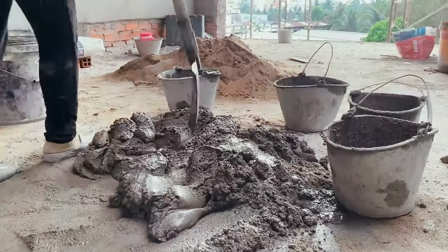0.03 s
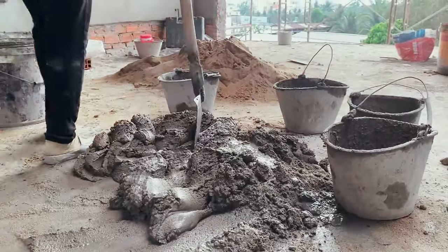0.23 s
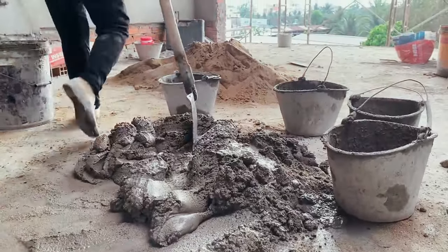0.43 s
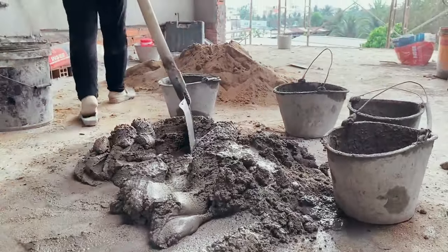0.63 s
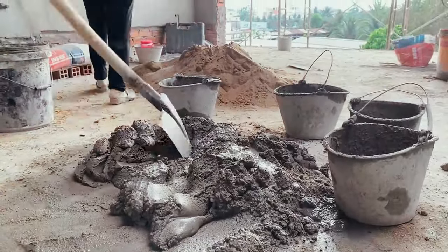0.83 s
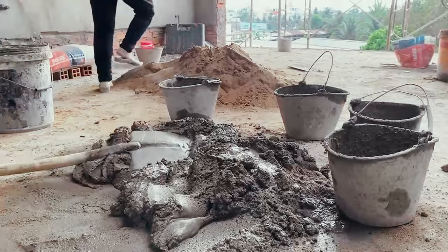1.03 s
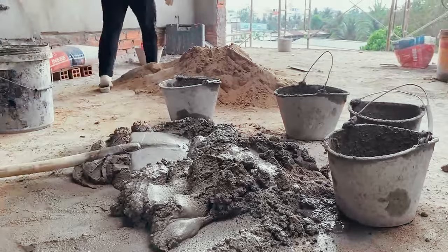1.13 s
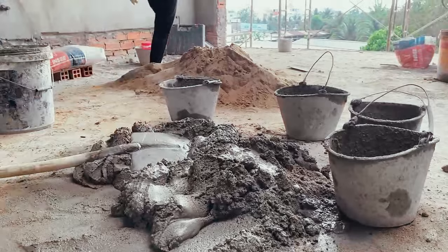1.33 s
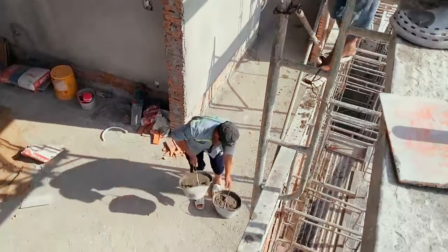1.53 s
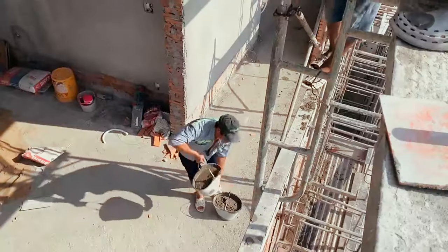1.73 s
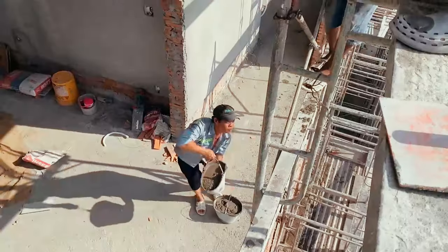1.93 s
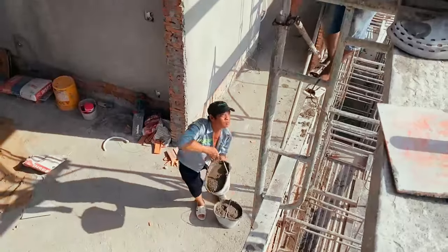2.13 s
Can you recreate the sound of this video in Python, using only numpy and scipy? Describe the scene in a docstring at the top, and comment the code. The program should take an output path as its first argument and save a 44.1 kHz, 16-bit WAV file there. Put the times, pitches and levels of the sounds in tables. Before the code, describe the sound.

Shovelling wet mortar with gritty scrapes and a ringing splat, followed by a rasping bucket pour.

```python
"""Shovelling and pouring wet mortar

A shovel stabs into a heap of wet mortar, leans over with a gritty scrape and flops onto the pile,
its shaft and blade ringing, while shoes scuff over concrete. After a short silence, mortar slides
out of a bucket and the last lumps trickle after it. Bare walls echo over the low rumble of the site."""
import sys
import numpy as np
from scipy import signal
from scipy.fft import rfft, irfft
from scipy.io import wavfile

SR = 44100
rng = np.random.default_rng(int(sys.argv[2]) if len(sys.argv) > 2 else 0)


def generate_wav(signal):
    """Clip the signal to [-1, 1] and save it as 16-bit WAV at the path in sys.argv[1]."""
    frames = np.transpose(np.atleast_2d(signal))
    scaled = np.clip(frames, -1, 1) * 32767
    pcm = np.round(scaled).astype(np.int16)
    wavfile.write(sys.argv[1], SR, pcm)


N = 97020
T = np.arange(N) / SR
FFT_SIZE = 2 ** 17
HZ = np.maximum(np.arange(FFT_SIZE // 2 + 1) * SR / FFT_SIZE, 1)

# Sounds are built as a pair: mid (what both ears share) and side (what sets left and right apart).
# How wide noise and echo sound. Each row: frequency in Hz, side level compared with mid in dB.
STEREO_WIDTH = [(60, -9), (160, -10.5), (400, -6.5), (800, -3), (2000, -2.5), (6000, -3.5), (12000, -0.5)]


def shovel():
    """Each blow sets shaft and blade ringing; clinging mortar muffles the tones and makes them drift."""
    # The shovel's own tones. Each row: pitch in Hz, level in dB, fade time in seconds.
    tones = [(205.6, 6, 0.15), (473, -28, 0.14), (523.2, 3.5, 0.43), (582, 6, 0.1), (639, -4, 0.27),
             (790, -9.5, .2), (875, -15, 0.32), (886, -16.5, .3), (979, -11, 0.64), (1869, -15.5, 0.14),
             (3220, -26, 0.11)]
    # Each row: start in seconds, level in dB, rise and muffled fade in seconds, then in dB
    # the level of the free ringing, the gain of the shaft's tones, and left compared with right.
    blows = [(.1128, -10, 0.0078, 0.017, -23.5, -5.5, -1), (1.045, -31, 0.0085, 0.047, -3, -43, -6),
             (1.0615, -23, 0.0039, 0.049, -19, -12, -25), (1.089, -33, 0.0041, 0.078, -10, -20, -2)]
    shaft_top_hz, blade_side_db = 300, -11
    drifts_hz = [10 * wander(rate=70) for _ in tones]
    out = np.zeros((2, N))
    for start, db, rise, muffled_fade, ring_db, shaft_db, pan_db in blows:
        age = np.maximum(T - start, 0)
        muffled = envelope(start, db, rise, 0, muffled_fade)
        pan = (amp(pan_db) - 1) / (amp(pan_db) + 1)
        for (hz, tone_db, fade), drift_hz in zip(tones, drifts_hz):
            is_shaft = hz < shaft_top_hz
            free = envelope(start, db + ring_db, rise, 0, fade)
            level = amp(tone_db + shaft_db * is_shaft) / 2 * (muffled + free)
            phase = 2 * np.pi * (hz * age + np.cumsum(drift_hz * (T > start)) / SR)
            ring = -np.sin(phase)
            # The blade's two faces send sound left and right out of step.
            side = pan * ring + amp(blade_side_db) * (not is_shaft) * np.cos(phase)
            out += level * np.array([ring, side])
    return out


def crunch():
    """The blade cuts through wet sand and stops hard."""
    # Each row: start in seconds, level in dB, then rise, hold and fade in seconds.
    cuts = [(0.076, -38.5, 0.031, .012, 0.053), (0.1102, -32, 0.0019, 0.006, 0.028),
            (0.124, -48, 0.0044, 0.0075, 0.63)]
    # The crushed grit's tone colour. Each row: frequency in Hz, level in dB.
    colour = [(300, -7), (800, -6.5), (1400, -6), (1850, -10.5), (2650, -13.5), (3300, -11.5),
              (4800, -18.5), (7100, -15), (8900, -9), (11100, -6), (15500, -20)]
    grit = grains(rate=4500, spread_db=2.5, hiss_db=-11)
    return diffuse(grit, amp(curve(colour))) * bursts(cuts)


def slaps():
    """The blade splats as it sinks into the heap or lands flat on it."""
    # Each row: start in seconds, level in dB, then rise, hold and fade in seconds.
    splats = [(0.125, -43.5, 0.0065, 0.041, 0.095), (1.04, -37, 0.015, 0.01, 0.046),
              (1.0626, -27, 0.00018, 0.0072, 0.069), (1.089, -41.5, 0.0048, 0.043, 0.052)]
    # The wet tone colour. Each row: frequency in Hz, level in dB.
    colour = [(40, -61), (100, -13), (330, -4), (425, -13.5), (500, 0.5), (800, -5.5), (1100, -12.5),
              (1300, -14.5), (2150, -20), (2800, -23.5), (3900, -28), (5000, -37), (8000, -41),
              (11000, -37), (15000, -51)]
    spatter = grains(rate=1800, spread_db=1.5, hiss_db=-2.5)
    return diffuse(spatter, amp(curve(colour))) * bursts(splats)


def clacks():
    """Stones in the mix strike the flat of the blade."""
    # Each row: start in seconds, level in dB, then rise, hold and fade in seconds.
    strikes = [(1.044, -44, 0.011, 0.0096, 0.042), (1.0565, -34.5, 0.00092, 0.0037, 0.0092),
               (1.0619, -33, 0.00028, 0.0007, 0.027), (1.071, -39.5, 0.00057, 0.0045, 0.075)]
    # The blade's bright tones. Each row: pitch in Hz, width in Hz, level in dB.
    blade_tones = [(2150, 170, -3), (3490, 270, -4), (3790, 700, 1), (4380, 480, -14)]
    return ringing_noise(blade_tones) * bursts(strikes)


def gulps():
    """The wet heap gulps after the stab, in low tones that waver and sag in pitch."""
    # Each row: start in seconds, level in dB, hold and fade in seconds, first and last pitch in Hz.
    low_tones = [(0.121, -34.5, 0.0057, 0.059, 218, 169), (0.159, -33.5, 0.022, 0.11, 185.5, 169),
                 (.256, -48.5, 0.012, 0.17, 187.6, 159), (0.291, -41, 0.014, 0.039, 159, 133),
                 (0.335, -47.5, 0.062, 0.18, 211.6, 163.2)]
    rise_s, sag_s, waver_hz = .01, .035, 9
    mid = np.zeros(N)
    for start, db, hold, fade, first_hz, last_hz in low_tones:
        sag = np.exp(-np.maximum(T - start, 0) / sag_s)
        hz = last_hz + (first_hz - last_hz) * sag + waver_hz * wander(rate=45)
        phase = 2 * np.pi * np.cumsum(hz * (T > start)) / SR
        mid += np.sqrt(2) * np.sin(phase) * envelope(start, db, rise_s, hold, fade)
    return np.array([mid, np.zeros(N)])


def scrapes():
    """Steel drags over sand and squeals faintly."""
    # Each row: start in seconds, level in dB, rise, hold and fade in seconds,
    # treble tilt in dB per octave, squeal level in dB.
    drags = [(0.475, -55.5, 0.012, 0.045, 0.15, 2, -6), (0.501, -58, 0.013, 0.0092, 0.1, -2.5, 5),
             (0.532, -47.5, 0.016, 0.015, 0.33, 1, 0), (1.399, -42, 0.015, .012, 0.2, -3, -31)]
    # The scrape's tone colour before tilting. Each row: frequency in Hz, level in dB.
    colour = [(150, -25.5), (400, -3.5), (900, 5), (1300, 3), (2200, -8), (3800, -6), (6000, -14.5),
              (11000, -13.5), (15000, -31)]
    grit = grains(rate=2300, spread_db=2.5, hiss_db=-0.5)
    squeal = diffuse(grit, resonance(hz=1040, width_hz=70))
    out = np.zeros((2, N))
    for *burst, tilt, squeal_db in drags:
        rasp = diffuse(grit, tilted(colour, tilt))
        out += (rasp + amp(squeal_db) * squeal) * envelope(*burst)
    return out


def fizz():
    """Wet sand crackles finely as the leaning blade parts it."""
    # Each row: start in seconds, level in dB, then rise, hold and fade in seconds.
    partings = [(0.715, -55.5, 0.008, 0.13, 0.51), (0.852, -61, 0.0086, 0.026, 0.63)]
    # The crackle's thin, high tone colour. Each row: frequency in Hz, level in dB.
    colour = [(2000, -9), (6000, -21), (9000, -2), (11000, 0), (12500, -1), (15000, -13)]
    crackle = grains(rate=2500, spread_db=2.5, hiss_db=0)
    return diffuse(crackle, amp(curve(colour))) * bursts(partings)


def pour():
    """Mortar rasps along the bucket wall and rings it; coarser lumps and stones trickle after."""
    # Each row of both: start in seconds, level in dB, then rise, hold and fade in seconds.
    slides = [(1.535, -50, 0.0041, 0.015, 0.079), (1.551, -43, 0.015, 0.011, 0.27),
              (1.576, -37.5, 0.01, 0.054, 0.48), (1.647, -44, 0.019, 0.021, 0.61)]
    trickles = [(1.887, -58.5, .005, 0.012, 0.41), (1.963, -56.5, 0.013, 0.016, 0.17),
                (2, -53, 0.012, 0.03, 0.34), (2.056, -52.5, 0.036, 0.022, 1)]
    # Their tone colours. Each row: frequency in Hz, level in dB.
    slide_colour = [(180, -44), (300, -15.5), (590, 0), (950, 0.5), (1300, -12), (1700, -5.5), (2650, -6),
                    (5350, -13), (7700, -15), (10800, -8), (12200, -13), (13000, -11), (15000, -46)]
    trickle_colour = [(300, -12.5), (800, 2.5), (1400, -6.5), (2400, 0.5), (4200, -2.5), (6000, -12.5),
                      (8000, -10), (11000, -3.5), (15000, -16)]
    # The bucket's own tones. Each row: pitch in Hz, width in Hz, level in dB.
    bucket_tones = [(605.8, 9.2, 8), (870.4, 44, 2.5), (1847, 90, 1.5), (2023, 9.4, 7), (2612, 82, -1.5),
                    (3174, 25, -1.5), (3917, 68, -4), (4740, 200, -10.5)]
    grit = diffuse(grains(rate=4400, spread_db=1, hiss_db=-2), amp(curve(slide_colour)))
    lumps = diffuse(grains(rate=1200, spread_db=0, hiss_db=-1), amp(curve(trickle_colour)))
    stones = amp(-11.5) * pebbles(count=900)
    wall = amp(-6.5) * ringing_noise(bucket_tones)
    slip = unit(amp(1.2 * wander(rate=130)))  # the mortar catches and slips
    return (grit * slip + wall) * bursts(slides) + (lumps + stones + amp(-9) * wall) * bursts(trickles)


def pebbles(count, low_hz=1690, high_hz=4820, fade_s=0.012):
    """Small stones tick against one another, each with its own brief pitch."""
    out = np.zeros((2, N))
    age = np.arange(int(fade_s * SR)) / SR
    for when, pitch, size, place in rng.random((count, 4)):
        hz = low_hz * (high_hz / low_hz) ** pitch
        ping = size ** 2 * np.sin(2 * np.pi * hz * age) * decay(age, fade_s)
        start = int(when * (N - len(age)))
        direction = [np.cos(np.pi * place), np.sin(np.pi * place)]
        out[:, start:start + len(age)] += np.outer(direction, ping)
    return unit(out)


def snaps(begin, end):
    """Stones snap under blade, shoe or bucket between two moments, each a brief cluster of clicks."""
    # Each row: start in seconds, level in dB.
    stones = [(0.3085, -45.5), (0.61, -47.5), (0.739, -55), (1.541, -44.5), (1.557, -41), (1.8925, -58),
              (2.006, -46), (2.109, -48), (2.172, -50)]
    clicks = grains(rate=5200, spread_db=0.5, hiss_db=-13.5)
    chips = diffuse(clicks, resonance(hz=3620, width_hz=33000))
    return chips * sum(envelope(start, db, rise=0.00073, hold=0.0013, fade=0.039)
                       for start, db in stones if begin <= start < end)


def thuds():
    """The heap and the footsteps on the floor thud softly."""
    # Each row: start in seconds, level in dB, then rise, hold and fade in seconds.
    bumps = [(0, -53, 0.0066, 0.11, 0.47), (0.127, -37.5, 0.019, 0.04, 0.22),
             (0.255, -50.5, 0.021, .015, 0.67), (0.471, -51.5, 0.014, 0.21, 0.22),
             (0.854, -60.5, 0.0058, 0.0086, 0.14), (1.057, -41, 0.012, 0.017, 0.57),
             (1.345, -56, .01, 0.065, .2)]
    # The dull tone colour. Each row: frequency in Hz, level in dB.
    colour = [(35, -57), (68, -14), (105, -8.5), (160, -0.5), (210, -15.5), (300, -18.5), (600, -50)]
    return diffuse(noise(), amp(curve(colour))) * bursts(bumps)


def scuffs():
    """Shoes and shifting mortar rub grit over the concrete."""
    # Each row: start in seconds, level in dB, rise, hold and fade in seconds, tilt in dB per octave.
    rubs = [(0, -54.5, 0.00057, 0.0092, 0.37, 0), (0.303, -64, 0.004, 0.0068, 0.048, -5),
            (0.315, -49.5, 0.007, 0.02, 0.44, -1), (0.41, -53.5, 0.027, 0.067, 0.21, -2.5),
            (0.604, -47.5, 0.0048, 0.0088, 0.47, -0.5), (0.725, -52, 0.0087, 0.0081, 0.08, -2),
            (0.851, -59, 0.012, 0.026, 1, 1), (1.025, -49.5, 0.017, 0.039, 0.09, 0.5)]
    # The scuff's tone colour before tilting. Each row: frequency in Hz, level in dB.
    colour = [(200, 7), (550, 2.5), (1100, -2.5), (2000, -3.5), (4000, -5), (7500, -9.5), (11000, -5),
              (15000, -12)]
    grit = grains(rate=4200, spread_db=1, hiss_db=-3.5)
    return sum(diffuse(grit, tilted(colour, tilt)) * envelope(*burst) for *burst, tilt in rubs)


def room(sources, echo_db, delay_s=0.0042, build_s=0.0016):
    """Mix the sources and add the dense echo of bare walls, which dies sooner in the treble."""
    # How long the echo lasts. Each row: frequency in Hz, fade time in seconds.
    fades = [(100, .5), (500, .3), (2000, .34), (6000, .29), (14000, .23)]
    age = np.maximum(T - delay_s, 0)
    hiss, tail = noise(), 0
    for hz, fade in fades:
        band = curve([(other_hz, other_hz == hz) for other_hz, _ in fades])
        tail = tail + shape(hiss, band) * decay(age, fade)
    tail = unit(tail * (1 - np.exp(-age / build_s))) / np.sqrt(N)
    to_walls = sum(source[0] * amp(db) for source, db in zip(sources, echo_db))
    mid, side = shape(to_walls, rfft(tail, FFT_SIZE))
    return sum(sources) + np.array([mid, shape(side, amp(curve(STEREO_WIDTH)))])


def site_rumble():
    """Far rumble and hiss of the site, behind the shovel."""
    # Each row: frequency in Hz, level in dB.
    colour = [(25, -27), (60, -3), (150, 3), (300, -5), (550, -5.5), (1100, -7.5), (1700, -12),
              (3900, -18.5), (7000, -28.5), (11000, -21.5), (15000, -38)]
    return diffuse(noise(), amp(curve(colour))) * amp(-60.5)


def yard_rumble():
    """The louder rumble of the yard, behind the bucket."""
    # Each row: frequency in Hz, level in dB.
    colour = [(25, -44), (101, 1.5), (243, 1), (573, -12), (903, -13.5), (1210, -37), (1580, -18.5),
              (2560, -21), (7480, -32.5), (10600, -30.5), (15000, -42)]
    return diffuse(noise(), amp(curve(colour))) * amp(-50)


def grains(rate, spread_db, hiss_db):
    """Sand grains of uneven size click about rate times a second, over the hiss of the finest ones."""
    hits = rng.random((2, N)) < rate / SR
    signs = np.sign(noise())
    sizes = amp(spread_db * np.minimum(rng.exponential(size=(2, N)), 4))
    return unit(hits * signs * sizes) + amp(hiss_db) * noise()


def noise():
    """Two unrelated hisses, for mid and side."""
    return rng.standard_normal((2, N))


def ringing_noise(tones):
    """Noise that rings at an object's own tones."""
    return diffuse(noise(), sum(amp(db) * resonance(hz, width) ** 2 for hz, width, db in tones))


def wander(rate):
    """A smooth random drift that turns about rate times a second."""
    return unit(shape(rng.standard_normal(N), np.exp(-(2 * HZ / rate) ** 2)))


def decay(age, fade):
    """Die away; a fade time is how long a sound takes to drop by 60 dB."""
    return np.exp(-np.log(1000) * age / fade)


def envelope(start, db, rise, hold, fade):
    """The loudness of one burst: it rises, holds and dies away."""
    age = T - start
    return amp(db) * np.clip(age / rise, 0, 1) * decay(np.maximum(age - rise - hold, 0), fade)


def bursts(rows):
    """The loudness of several bursts added together."""
    return sum(envelope(*row) for row in rows)


def amp(db):
    """Turn decibels into a gain."""
    return 10 ** (np.asarray(db) / 20)


def unit(x):
    """Scale to an average (rms) level of 1."""
    return x / np.sqrt(np.mean(x ** 2))


def curve(points):
    """Join (Hz, value) points with straight lines on a scale of octaves."""
    hz, value = np.array(points, float).T
    return np.interp(np.log(HZ), np.log(np.sort(hz)), value)


def tilted(colour, db_per_octave):
    """Gains for a tone colour made brighter or duller."""
    return amp(curve(colour) + db_per_octave * np.log2(HZ))


def resonance(hz, width_hz):
    """Gains that favour one pitch, 1 at the centre."""
    return 1 / (1 + 1j * (HZ ** 2 - hz ** 2) / (HZ * width_hz))


def shape(x, gain):
    """Filter with a gain for each frequency."""
    return irfft(rfft(x, FFT_SIZE) * gain, FFT_SIZE)[..., :N]


def diffuse(pair, gain):
    """Filter two unrelated signals into a wide sound whose mid has an average (rms) level of 1."""
    width = np.array([np.ones(len(HZ)), amp(curve(STEREO_WIDTH))])
    wide = shape(pair, gain * width)
    return wide / np.sqrt(np.mean(wide[0] ** 2))


def hollow(x, depth_db, hz=1144, width_hz=74):
    """Make a narrow dip in the midrange."""
    return shape(x, amp(depth_db * np.exp(-((HZ - hz) / width_hz) ** 2)))


def scene():
    """The shovel at the heap, a moment of silence, then the bucket in the yard."""
    heap_end_s, yard_start_s, ramp_s = 1.426, 1.471, .002
    sources = [shovel(), crunch(), slaps(), clacks(),
               thuds() + scuffs() + scrapes() + fizz() + snaps(0, heap_end_s)]
    heap = room(sources, echo_db=[-11.5, -9, -5, -15, -12]) + gulps() + site_rumble()
    bucket = room([pour() + snaps(yard_start_s, T[-1])], echo_db=[-10])
    yard = hollow(bucket, depth_db=-31) + hollow(yard_rumble(), depth_db=-12)
    heap *= np.clip((heap_end_s - T) / ramp_s, 0, 1)
    yard *= np.clip((T - yard_start_s) / ramp_s, 0, 1)
    mid, side = heap + yard
    return np.array([mid + side, mid - side])


def record(dry, top_hz=15800):
    """Narrow dips thin the treble; the very top is cut off."""
    # Treble dips in mid and side. Each row: frequency in Hz, gain in dB.
    mid_colour = [(7800, -1), (8350, -6.5), (8750, -16), (9250, -19.5), (9700, -5.5), (10800, -3),
                  (12300, -4), (13250, -27), (14200, -3), (15500, -20)]
    side_colour = [(5000, 0.5), (6700, -0.5), (8000, -4), (9300, 1.5), (11100, -13.5), (12500, -3),
                   (14000, -5.5)]
    left, right = dry
    mid = shape((left + right) / 2, amp(curve(mid_colour)))
    side = shape((left - right) / 2, amp(curve(side_colour)))
    low_pass = signal.ellip(10, .2, 80, top_hz, fs=SR, output="sos")
    return signal.sosfilt(low_pass, np.array([mid + side, mid - side]))


dry = scene()
out = record(dry)
generate_wav(out)
```